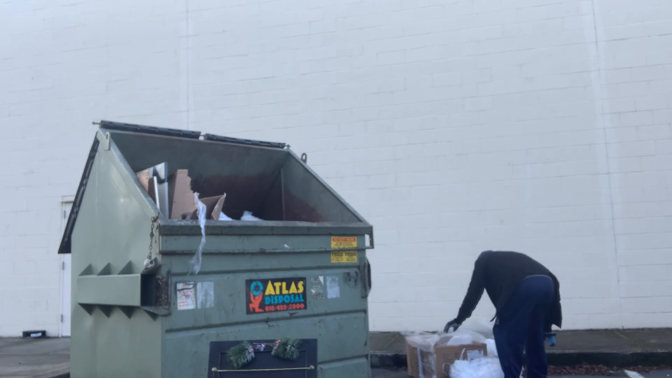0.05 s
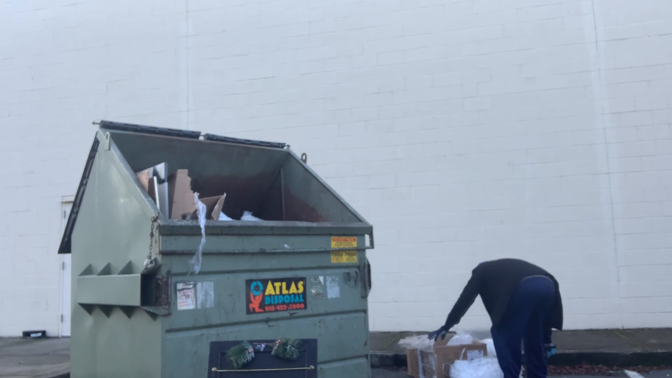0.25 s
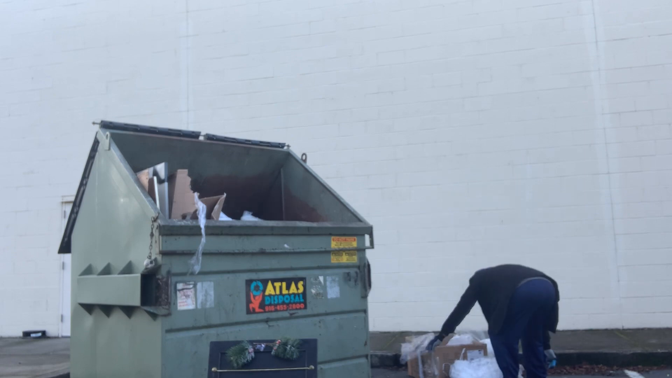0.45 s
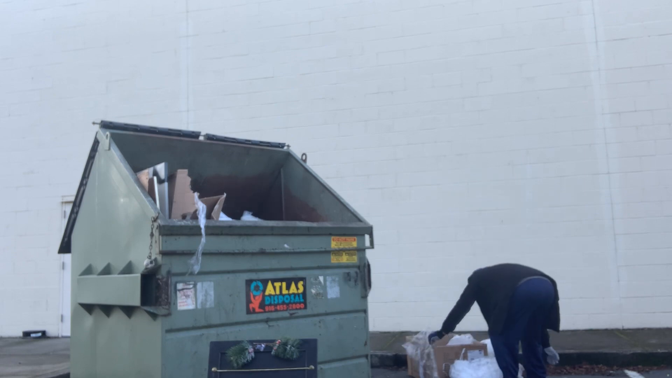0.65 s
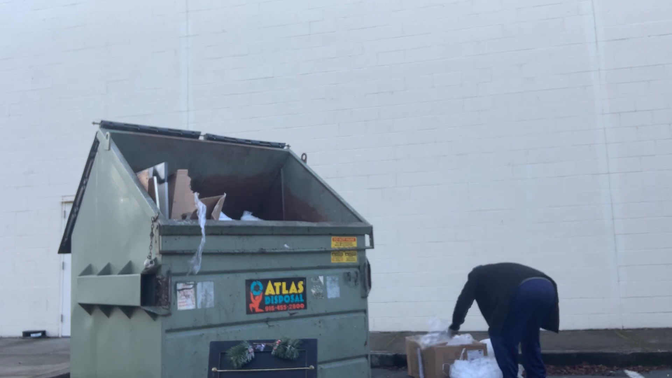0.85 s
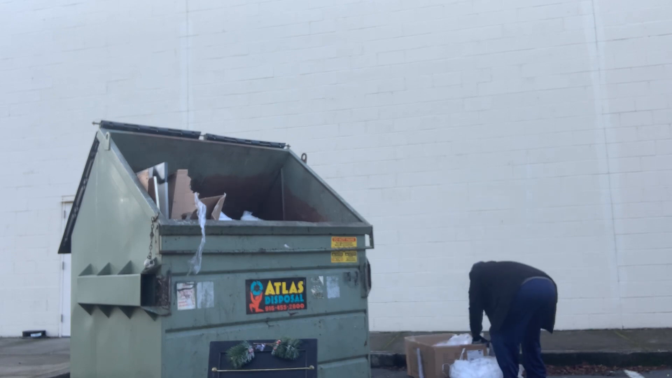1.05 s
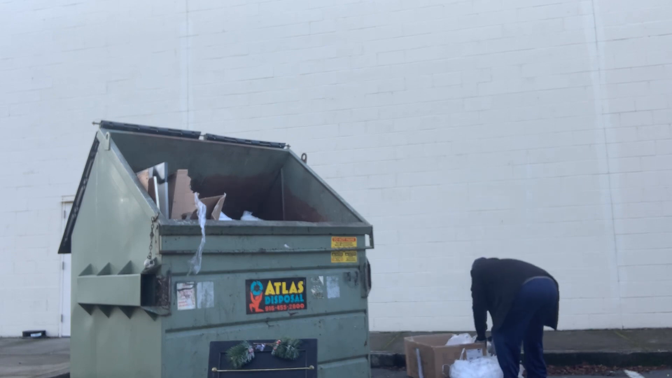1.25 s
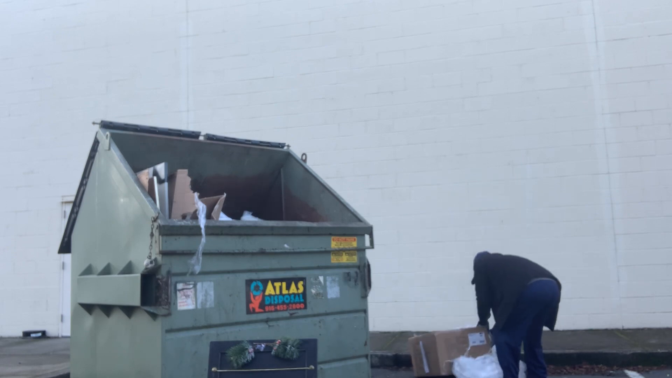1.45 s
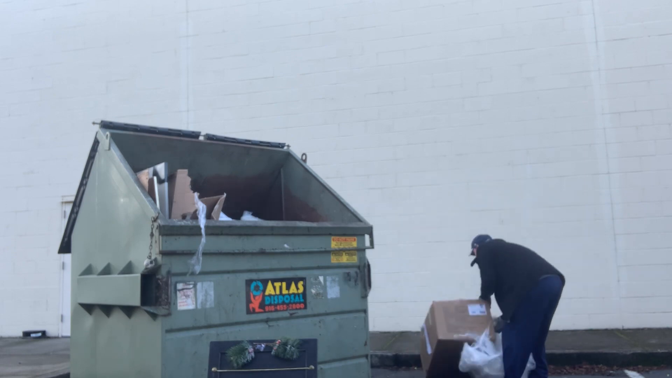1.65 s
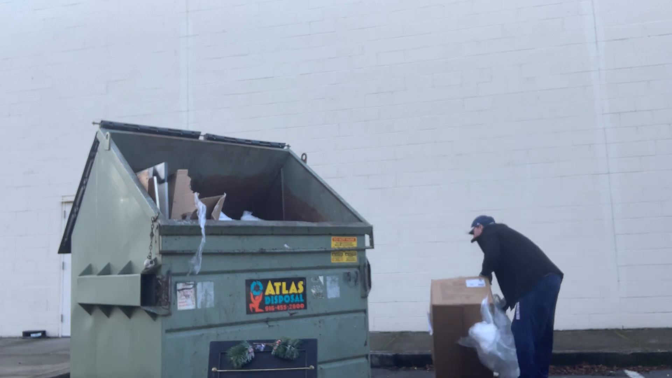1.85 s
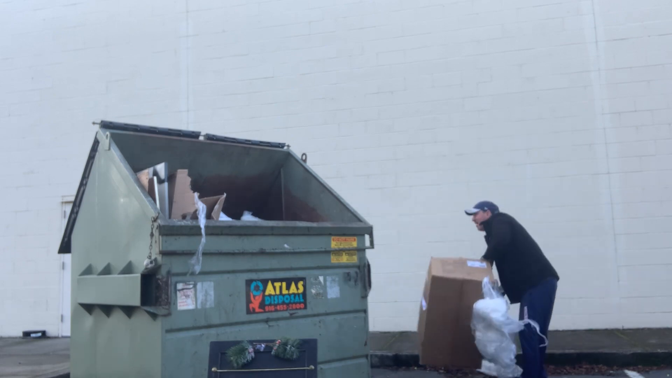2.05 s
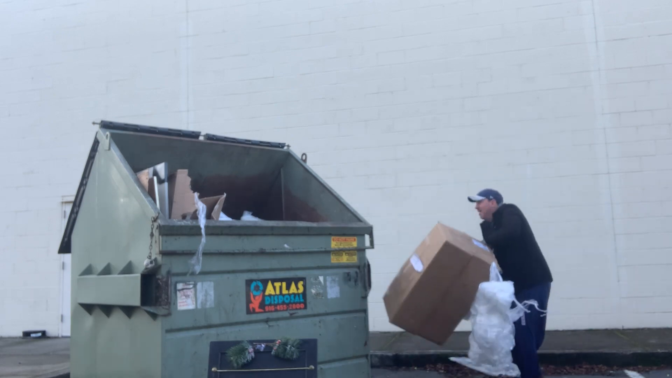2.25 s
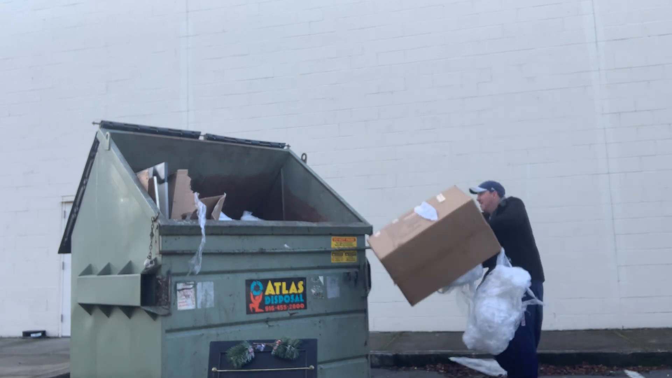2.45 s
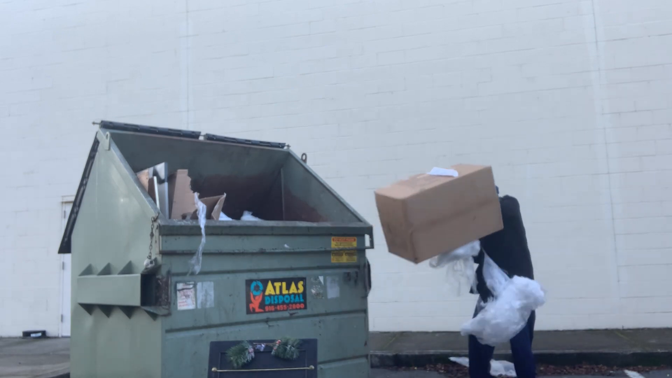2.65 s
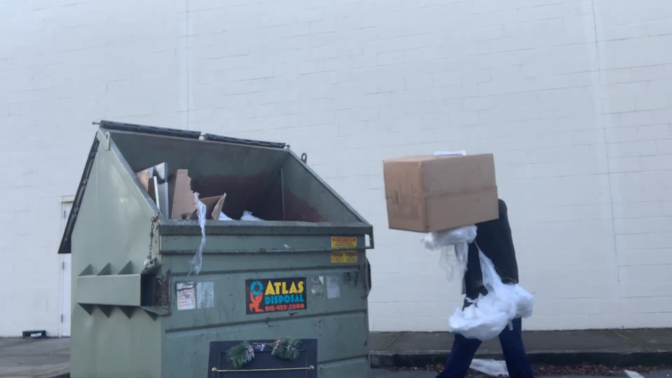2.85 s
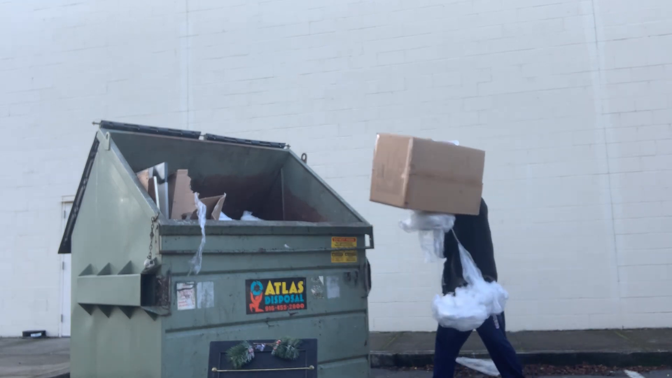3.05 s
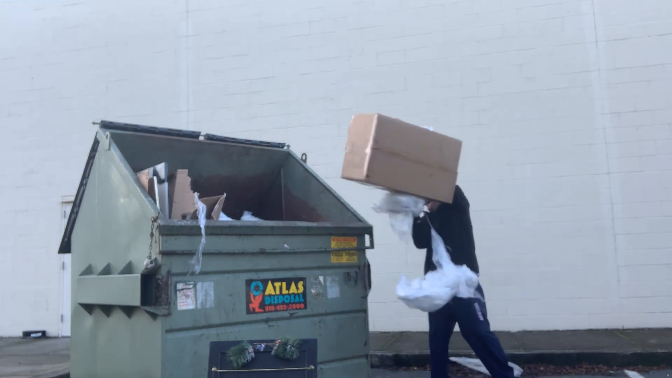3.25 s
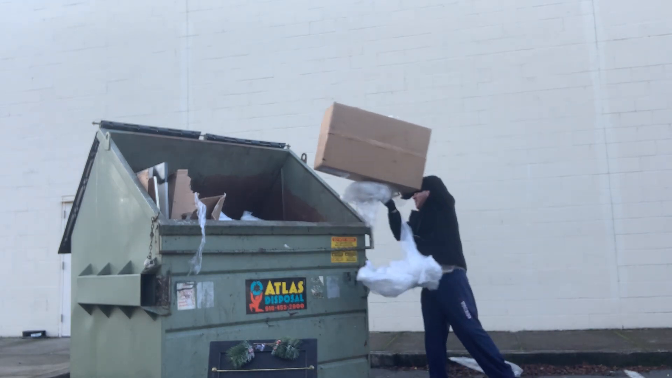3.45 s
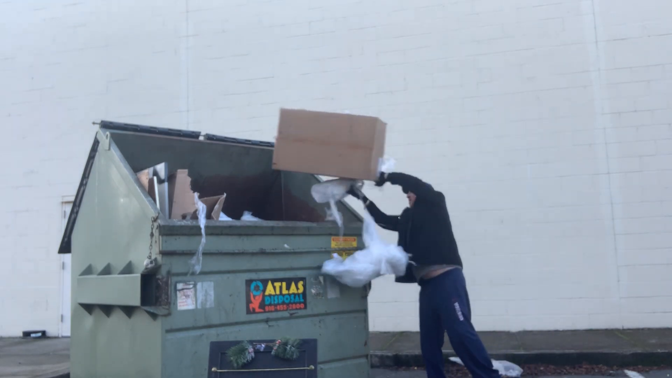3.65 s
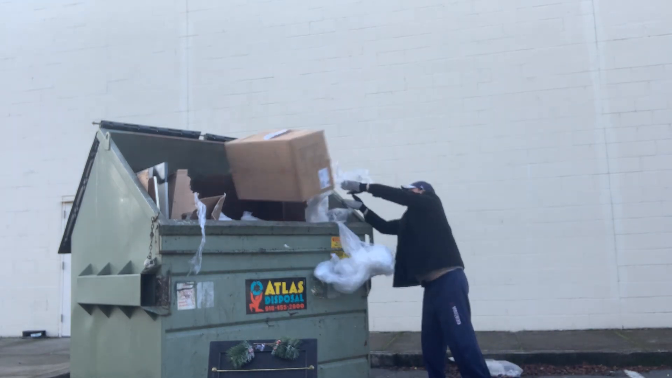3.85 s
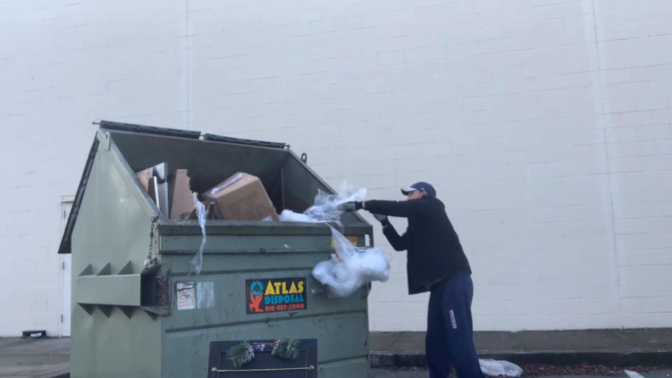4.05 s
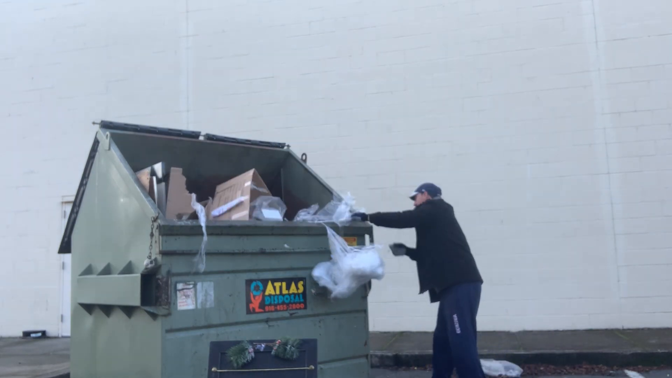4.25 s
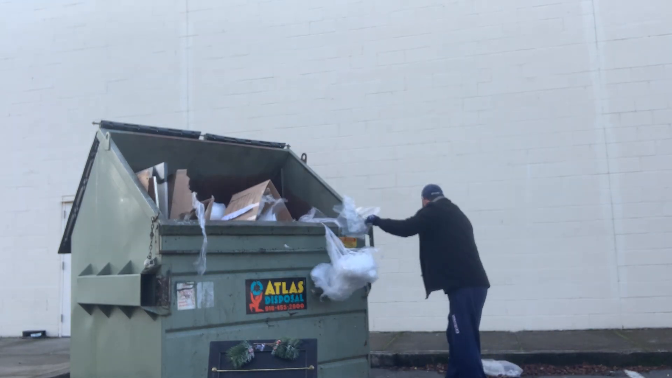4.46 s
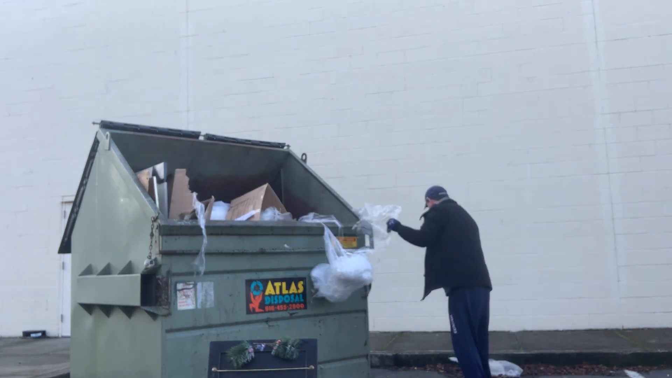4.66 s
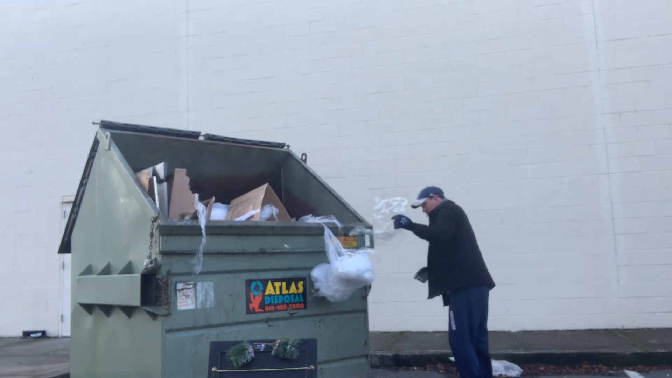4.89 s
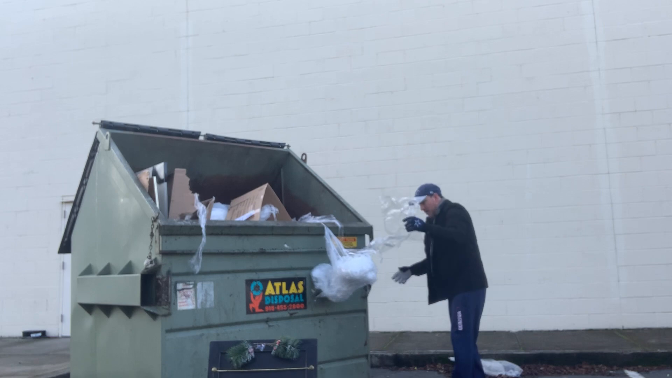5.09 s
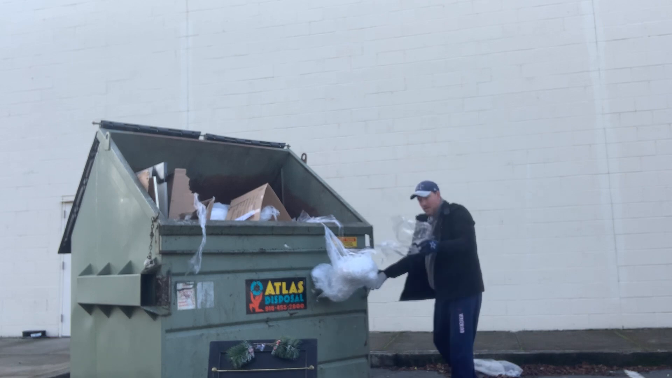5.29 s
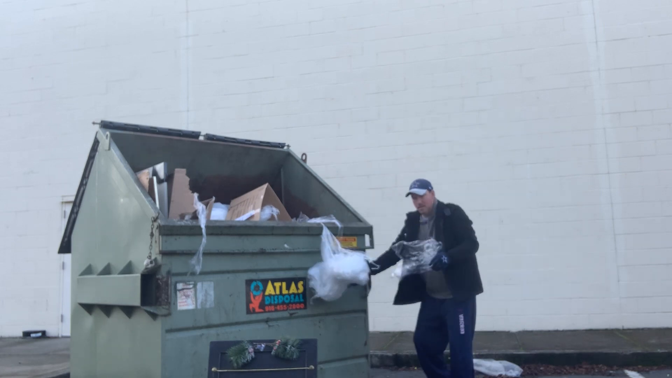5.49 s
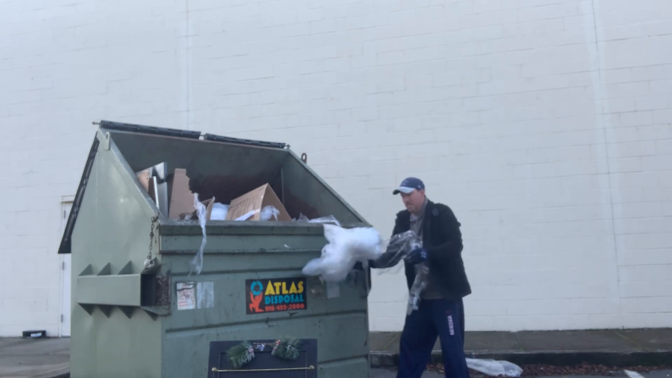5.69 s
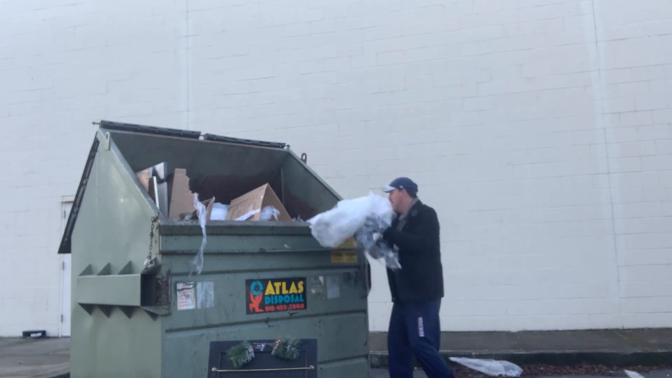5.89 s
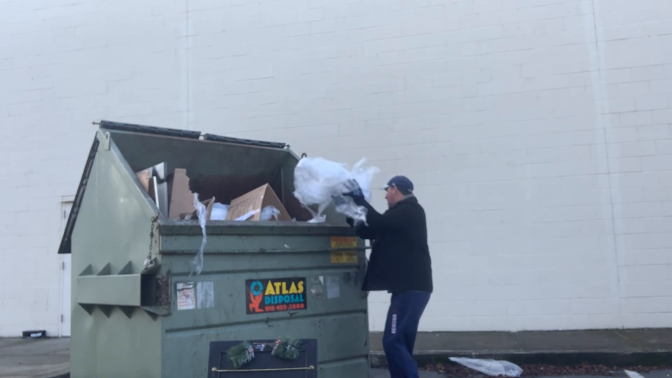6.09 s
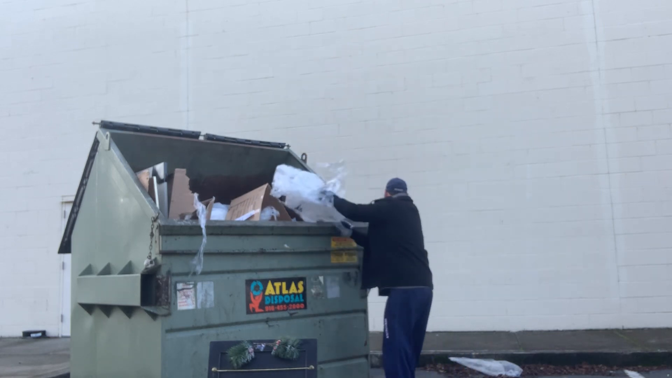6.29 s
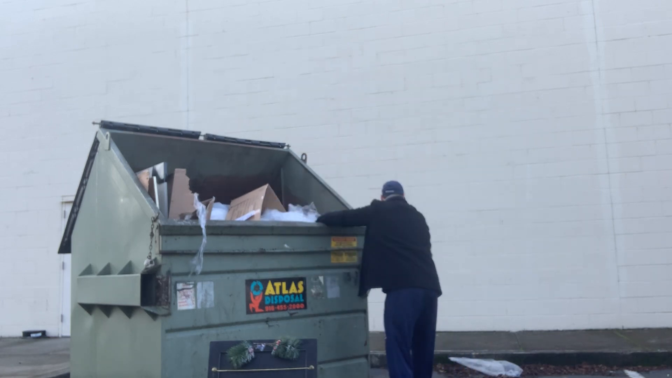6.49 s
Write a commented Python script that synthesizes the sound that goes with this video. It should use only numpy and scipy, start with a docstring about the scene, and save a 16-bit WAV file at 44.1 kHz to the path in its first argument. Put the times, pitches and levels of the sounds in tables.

```python
"""Outdoors beside a wall, someone picks up an empty cardboard box and a bundle of plastic wrap and tosses the
box into a steel dumpster. Clumped clicks and bursts crinkle the plastic throughout and scrape the board; the
packing cracks once. The box knocks hollowly as it is carried, lands with a thud and slides in: bending panel
tones over dying box modes. The bin booms in low modes when bumped, and filtered noise makes distant traffic
over a faint hum. Each source sits in a stereo image whose phase shifts with its place."""
import sys
import numpy as np
from scipy import signal
from scipy.fft import rfft, irfft
from scipy.io import wavfile

SR = 44100
rng = np.random.default_rng(int(sys.argv[2]) if len(sys.argv) > 2 else 0)


def store_wav(level_fs):
    """Save 16-bit WAV to argv[1]."""
    pcm = np.round(np.clip(np.atleast_2d(level_fs), -1, 1) * 32767)
    wavfile.write(sys.argv[1], SR, pcm.T.astype(np.int16))


N = 287973
TIME = np.arange(N) / SR
FREQS = np.fft.rfftfreq(N, 1 / SR)
EDGE_HZ, LOW_CUT_HZ = 15950, 44  # top and bottom of what the microphones pass on

# The box leaves the ground. A pair: start and end in seconds.
LIFT_OFF = (1.667, 1.708)

# Each grab, tug or step that squeezes the plastic.
# Each row: start in seconds, length in seconds, relative level in dB.
SQUEEZES = [(-.06, 0.14, -54), (.27, 0.12, -50), (.35, 0.1, -38), (.47, 0.37, -41.5), (.69, 0.12, -33),
            (.83, 0.17, -36), (1.04, 0.45, -46.5), (1.37, 0.16, -42.5), (1.54, 0.091, -30.5),
            (1.72, .17, -44), (1.93, 0.1, -45), (2.15, 0.32, -50.5), (2.32, 0.34, -49), (2.6, 0.15, -43),
            (2.8, 0.24, -53.5), (2.95, 0.21, -50), (3.31, 0.054, -57), (3.44, 0.34, -50.5),
            (3.66, .24, -41), (3.94, 0.13, -36), (4.08, 0.43, -42.5), (4.17, 0.047, -39.5),
            (4.51, 0.22, -50.5), (4.72, .19, -45), (4.95, 0.039, -52.5), (5.17, 0.06, -45),
            (5.25, 0.16, -43.5), (5.42, 0.31, -43), (5.64, 0.11, -44), (5.75, 0.093, -36.5),
            (5.87, 0.089, -39), (5.99, 0.18, -39.5), (6.23, 0.099, -41.5), (6.32, 0.11, -33.5),
            (6.43, 0.073, -38)]
REST_DB = -60  # the bundle keeps settling between squeezes; same scale as SQUEEZES


def hands():
    """The movements of the hands as one gain, which drives both plastic and board."""
    return np.hypot(strokes(SQUEEZES), amp(REST_DB))


# Thick wrap in the box. Each row: frequency in Hz, relative density in dB per Hz.
WRAP_COLOUR = [(300, -36), (1500, -10), (2600, -6), (3600, -1), (5200, .5), (7200, .5), (9000, 0),
               (11000, .5), (13500, -1.5), (15700, -5)]
# The thin bag. Each row: frequency in Hz, relative density in dB per Hz.
BAG_COLOUR = [(300, -36), (1500, -10), (2500, -8), (3600, -1.5), (5000, -3.5), (6800, -5), (9000, .5),
              (11000, 0), (13500, -.5), (15700, -4)]
# The walk to the bin, after which the bag is heard more than the wrap. A pair: start and end in seconds.
ARRIVAL = (3.4, 3.74)
# The loudest folds of plastic snapping through.
# Each row: start in seconds, relative level of the bright snap in dB, of the duller crunch in dB.
SNAPS = [(0.303, -42, -58), (0.3945, -33, -52), (.43, -33, -43), (0.493, -32, -42), (0.599, -34, -46),
         (.8764, -33, -38), (0.938, -40, -45), (1.2737, -54, -39), (1.357, -39, -39), (1.4493, -28, -48),
         (1.556, -30, -47), (1.573, -28, -44), (1.5998, -26, -43), (2.083, -42.5, -54), (2.65, -42, -52),
         (3.818, -43, -33), (3.829, -34, -35), (4.045, -43, -45), (4.769, -45, -54), (4.836, -41, -35),
         (5.134, -35, -53), (5.7688, -37, -48), (5.8063, -31, -44), (5.835, -40, -35), (5.902, -48, -40),
         (5.9106, -38, -48), (5.9763, -35, -39), (6.045, -46, -45), (6.1334, -38, -33.5),
         (6.2625, -38, -46), (6.3599, -32, -46), (6.4863, -31, -31)]
SNAP_T60_S = 0.027
# A taut fold, brighter than the crinkle. Each row: frequency in Hz, relative density in dB per Hz.
SNAP_COLOUR = [(300, -46), (1500, -21), (3600, -6.5), (6500, -3), (9000, 5), (12000, 3), (15700, -7)]
# The thicker layers under a fold. Each row: frequency in Hz, relative density in dB per Hz.
CRUNCH_COLOUR = [(300, -16), (1200, -3), (2400, -4), (3600, 6), (5200, -5), (7000, 3), (10000, -25),
                 (15700, -28)]


def plastic(squeeze):
    """Countless small folds buckle, first in the wrap, then in the bag; larger ones crackle, a few snap."""
    small = grains(per_s=7000, spread_db=-1.0, clump_db=1.75, clumps_per_s=35)
    large = grains(per_s=300, spread_db=0.0, clump_db=2.0, clumps_per_s=27)
    folds = small + amp(-11.5) * large
    wrap, bag = passing(ARRIVAL)
    band = (7000, 15500)  # both materials are levelled here, in Hz
    coloured = wrap * tint(folds, WRAP_COLOUR, band) + bag * tint(folds, BAG_COLOUR, band)
    crinkle = amp(-6.5) * squeeze * coloured
    bright = bursts([(s, db, SNAP_T60_S) for s, db, _ in SNAPS])
    dull = bursts([(s, db, SNAP_T60_S) for s, _, db in SNAPS])
    snaps = amp(-1.0) * tint(bright, SNAP_COLOUR)
    crunches = amp(-6.0) * tint(dull, CRUNCH_COLOUR)
    return yard(crinkle + snaps + crunches, wet_db=-9.5, t60_low=0.33, t60_high=0.055)


# Blows on the empty box as it bumps off the ground, is jostled, lands and tumbles.
# Each row: start in seconds, relative level in dB, settled pitch of the struck panel in Hz, T60 in seconds.
KNOCKS = [(1.613, -29, 810, 0.015), (1.621, -25.5, 290, .035), (1.682, -29, 434, 0.024),
          (2.364, -32.5, 534, .03), (2.918, -14.5, 484, 0.022), (2.9213, -26, 289, 0.029),
          (2.94, -35, 393, .07), (3.211, -24, 620, 0.01), (3.2148, -12.5, 362, 0.019),
          (3.2215, -22.5, 192, .05), (3.254, -32, 255, 0.076), (3.3375, -37, 560, 0.013),
          (3.3388, -25.5, 265, .035), (3.3458, -26, 180, 0.031), (3.3578, -37, 234, .06),
          (4.0147, -11, 290, 0.019), (4.022, -26, 191, .03), (4.0281, -15, 150, 0.021),
          (4.029, -34, 427, .03), (4.041, -20.5, 105, 0.052), (4.052, -27.5, 287, 0.13),
          (4.074, -32, 473, .06), (4.112, -30, 365, 0.033), (4.191, -26, 376, .018),
          (4.205, -29.5, 270, .035), (4.226, -32, 420, 0.035), (4.2371, -28, 364, .018),
          (4.2671, -25, 340, 0.021), (4.279, -30, 430, 0.015), (4.2992, -27, 170, 0.041)]
# Modes of the whole box, before their scatter.
# Each row: frequency in Hz, relative level in dB, T60 in seconds.
BOX_MODES = [(150, -9.5, 0.1), (231.4, -9, 0.25), (277.5, -7.5, .17), (355, -5.5, 0.13), (456, -7, .11),
             (534, -6.5, 0.071), (750, -10, 0.024), (990, -16, 0.014), (1460, -15, .021)]
# The hollow box shuddering or fluttering. Each row: frequency in Hz, relative density in dB per Hz.
HOLLOW_COLOUR = [(60, -5.5), (150, 1), (280, -6), (480, -3), (700, -16.5), (1000, -13.5), (1500, -19),
                 (4000, -52)]


def knocks():
    """Each blow flaps one panel and stirs the modes of the whole box, which shift as it is dented."""
    out = np.zeros((2, N))
    for s, db, hz, t60 in KNOCKS:
        panel = flap(hz, t60, contact_s=0.0021)
        whole = ring(BOX_MODES, contact_s=0.00055, scatter=0.064)
        add(out, s, amp(db) * (panel + amp(-13.5) * whole))
    flutter = amp(-18) * tint(bursts([(s, db, .09) for s, db, _, _ in KNOCKS]), HOLLOW_COLOUR)
    return yard(out + flutter, wet_db=-11, t60_low=.42, t60_high=.2)


BEND, BEND_S = 0.26, 0.0036  # a struck panel starts sharp by this share and relaxes with this time constant


def flap(hz, t60, contact_s):
    """A dented panel swings back, its pitch sagging as it relaxes; two parts a quarter cycle apart."""
    t = TIME[:SR]
    turns = np.cumsum(hz * (1 + BEND * np.exp(-t / BEND_S))) / SR
    envelope = amp(-60 * t / t60) * (1 - np.exp(-(t / contact_s) ** 2))
    z = envelope * np.exp(2j * np.pi * turns)
    return np.array([z.imag, z.real])


# Harder scrapes of the board on the ground, the rubbish and the rim.
# Each row: start in seconds, length in seconds, relative level in dB.
SCRAPES = [(.7, 0.043, -42.5), (1.41, 0.1, -49), (1.51, 0.1, -45), (1.57, 0.06, -37.5), (1.76, 0.23, -54.5),
           (2.32, 0.037, -52), (2.62, 0.25, -56), (2.98, 0.093, -52), (4.015, 0.06, -43),
           (4.255, 0.04, -47), (4.53, 0.068, -54.5), (5.55, 0.1, -55.5), (6.09, .031, -47)]
# Board on asphalt. Each row: frequency in Hz, relative density in dB per Hz.
ASPHALT_COLOUR = [(100, -25), (500, -9), (800, -6), (1150, -3.5), (1600, 1), (2100, -3), (2700, -7.5),
                  (4000, -9), (6500, -7), (11000, -14), (16000, -28)]
# Board on cloth and other board. Each row: frequency in Hz, relative density in dB per Hz.
CLOTH_COLOUR = [(100, -27.5), (500, 2.5), (800, -3.5), (1150, 1.5), (1600, 1.5), (2200, -6), (2700, -8.5),
                (3700, -5.5), (6500, -13), (11000, -90), (16000, -35)]
# The box shuddering as it is dragged, then as it slides into the bin: one level curve for each.
# Each row of a curve: time in seconds, relative level in dB.
SLIDES = [
    [(1.35, -55), (1.58, -45.5), (1.64, -54), (1.685, -45), (1.8, -67)],
    [(4.08, -36), (4.15, -49), (4.2, -47), (4.27, -44.5), (4.34, -50.5), (4.43, -53), (4.49, -55),
     (4.6, -59), (4.7, -82)],
]
# A stiff edge of the board snapping. Each row: frequency in Hz, relative density in dB per Hz.
EDGE_COLOUR = [(500, 9.5), (2000, -13.5), (3600, 5.5), (5000, -8), (7500, -30), (16000, -35)]
# The box also rubs on sleeves and wrap: relative rub level in dB at a typical squeeze in dB,
# and dB of rub per dB of squeeze.
BRUSH_DB, TYPICAL_DB, BRUSH_FOLLOWS = -55, -41, 0.81


def cardboard(squeeze):
    """Rough board slips finely and catches coarsely, its creases tap, and the sliding box shudders."""
    fine = grains(per_s=3000, spread_db=0.5, clump_db=2.0, clumps_per_s=14.0)
    coarse = grains(per_s=260, spread_db=2, clump_db=2, clumps_per_s=30)
    slips = unit(fine + .7 * coarse)
    ground, lifted = passing(LIFT_OFF)
    band = (1000, 2200)  # both surfaces are levelled here, in Hz
    brush = amp(BRUSH_DB) * (squeeze / amp(TYPICAL_DB)) ** BRUSH_FOLLOWS
    friction = np.hypot(brush, strokes(SCRAPES))
    coloured = ground * tint(slips, ASPHALT_COLOUR, band) + lifted * tint(slips, CLOTH_COLOUR, band)
    rub = amp(-1.5) * friction * coloured
    taps = amp(-4.5) * creases()
    edges = amp(-2.5) * tint(bursts([(s, db, t60) for s, _, db, t60, _ in TAPS]), EDGE_COLOUR)
    drag = sum(level(rows) * (TIME > rows[0][0]) * (TIME < rows[-1][0]) for rows in SLIDES)
    judder = grains(per_s=900, spread_db=4.0, clump_db=2.0, clumps_per_s=19)
    shudder = amp(-1.5) * drag * tint(judder, HOLLOW_COLOUR, (170, 600))
    return yard(rub + taps + edges + shudder, wet_db=-10, t60_low=0.26, t60_high=0.3)


# Creases of the board tapping and their stiff edges snapping. Each row: start in seconds, relative level
# of the tap in dB, of the edge in dB, T60 of rasp and edge in seconds, pitch of the tap in Hz.
TAPS = [(1.4222, -32.5, -55, .04, 1750), (1.4328, -44, -35, 0.019, 1660), (1.4774, -32, -58, .025, 1480),
        (1.501, -36, -60, .02, 1530), (1.5266, -32.5, -58, 0.024, 1420), (1.5612, -28, -56, .029, 1470),
        (1.574, -31, -33, 0.035, 1270), (1.601, -28, -41, 0.088, 1460), (1.613, -22, -35, 0.059, 1580),
        (1.637, -29, -42, .05, 1770), (1.6655, -18.5, -40, 0.036, 1530), (1.684, -35, -51, 0.031, 1630),
        (1.987, -27.5, -47, 0.031, 1840), (2.083, -23, -37, 0.019, 1580), (2.108, -29, -40, 0.019, 1550),
        (2.1298, -33, -46, .025, 1370), (2.226, -36.5, -58, 0.014, 1150), (2.349, -39, -44, 0.056, 1200),
        (2.3734, -47, -34.5, .032, 1360), (2.9132, -39, -49, .03, 930), (3.095, -44, -58, .03, 1220),
        (3.2109, -36, -50, 0.017, 1260), (3.628, -37, -46, 0.031, 1290), (4.0126, -30, -46, .016, 1170),
        (4.03, -26, -29, 0.04, 1430), (4.0386, -27.5, -31, 0.026, 1270), (4.0452, -40, -23.5, 0.028, 1270),
        (4.117, -35.5, -50, 0.026, 1110), (4.2604, -34, -40, 0.046, 1420), (4.279, -31.5, -48, 0.045, 1600),
        (4.4, -33, -56, 0.027, 1460), (4.4846, -35, -52, 0.02, 1090), (4.5568, -41, -52, .025, 1310),
        (4.619, -42, -58, .03, 1390), (5.1034, -39.5, -53, 0.022, 1330), (5.6864, -27.5, -50, 0.017, 1550)]
# A crease of pitch TAP_HZ, before it shifts with the pitch.
# Each row: frequency in Hz, relative density in dB per Hz.
TAP_COLOUR = [(150, -7.5), (600, -5.5), (900, -6.5), (1250, 1), (1550, 3.5), (1900, -1), (2350, -10),
              (2900, -8.5), (4000, -24), (7000, -9), (11000, -30), (16000, -21)]
TAP_HZ = 1504
POP_DB, POP_T60_S, POP_DELAY_S = 5, 0.0085, 0.00099  # the fold flips over just after it starts to give


def creases():
    """Each crease of the board pops and rasps at its own pitch: the shorter the fold, the higher."""
    out = np.zeros((2, N))
    for s, db, _, t60, pitch in TAPS:
        shifted = [(hz * pitch / TAP_HZ, gain) for hz, gain in TAP_COLOUR]
        rasp = tint(burst(db, t60), shifted)
        add(out, s, amp(-1.5) * rasp)
        pop = ring([(pitch, db + POP_DB, POP_T60_S)], contact_s=0.00055)
        add(out, s + POP_DELAY_S, pop)
    return out


CRACK_S = 0.7046  # start of the one sharp crack
# The spray of the crack. Each row: frequency in Hz, relative density in dB per Hz.
SPRAY_COLOUR = [(100, -35), (400, -20), (800, -21), (1200, -1), (1800, -3), (2450, -14), (3400, 1),
                (4400, -5), (5300, 2.5), (6400, -5), (8700, .5), (10500, -3), (12500, -11), (15500, -8)]
# Its papery ring, before scatter. Each row: frequency in Hz, relative level in dB, T60 in seconds.
CRACK_MODES = [(1030, -16, .06), (1206, 0, .04), (1360, -1, .035), (1556, -4, .045), (1830, -4, .04)]
# The ring direct, then off the ground and the bin. Each row: delay in seconds, relative level in dB.
CRACK_PATHS = [(0, -14.5), (.0085, -18), (.019, -28), (.029, -30)]
# The board buzzing afterwards. Each row: frequency in Hz, relative density in dB per Hz.
RATTLE_COLOUR = [(100, -32), (450, -7), (780, -18), (1100, -5), (1300, -1), (1850, -11), (2400, -31),
                 (6000, -42)]


def crack():
    """A spray of treble, a short papery ring slapping back from ground and bin, and a dying rattle."""
    spray = tint(bursts([(CRACK_S, -11.3, .03)]), SPRAY_COLOUR)
    body = tint(bursts([(CRACK_S + 0.00498, -30, .16)]), RATTLE_COLOUR)
    for delay_s, db in CRACK_PATHS:
        papery = ring(CRACK_MODES, contact_s=0.00048, scatter=.008)
        add(body, CRACK_S + delay_s, amp(db) * papery)
    return yard(spray + body, wet_db=-11, t60_low=.28, t60_high=.28)


# Blows that reach the steel walls of the bin. Each row: start in seconds, relative level in dB.
BOOMS = [(4.04, -25), (4.054, -30), (4.089, -24.5), (4.332, -26), (4.411, -30), (4.649, -36),
         (5.512, -28.5), (5.66, -28.5), (5.754, -27), (5.983, -25), (6.138, -21.5)]
# Modes of the bin. Each row: frequency in Hz, relative level in dB, T60 in seconds.
BIN_MODES = [(55.4, -6, 0.29), (66.3, 3, 0.17), (82.5, 2, 0.15), (106.6, 1.5, 0.048), (147, -34, 0.093),
             (272, -24.5, 0.18), (345, -24, 0.049)]


def dumpster():
    """The big steel panels boom, damped by the rubbish inside."""
    out = np.zeros((2, N))
    for s, db in BOOMS:
        add(out, s, amp(db) * ring(BIN_MODES, contact_s=0.01))
    return out


# Far traffic. Each row: frequency in Hz, relative density in dB per Hz.
TRAFFIC_COLOUR = [(12, -45), (20, -7.5), (60, 2.5), (93, -2), (234, -12.5), (367, -15.5), (422, -18),
                  (607, -23), (897, -24.5), (1190, -27.5), (2020, -37.5), (2600, -37.5), (4810, -36.5),
                  (9140, -57), (16000, -77)]
TRAFFIC_DB = -43.5  # middle level between 40 and 140 Hz
# Machinery in the building. Each row: frequency in Hz, middle rms level in dB.
HUM = [(240, -60), (360, -61.5), (600, -63.5)]


def street():
    """Lumpy far traffic and a faint hum that wavers in level and phase."""
    noise = tint(rng.standard_normal((2, N)), TRAFFIC_COLOUR, (40, 140), size=16384)
    roar = noise * amp(TRAFFIC_DB + 1.3 * drift(12.0))
    hum = 0
    for hz, db in HUM:
        phase = 2 * np.pi * hz * TIME + .5 * drift(3.5)
        hum = hum + amp(db + 2 * drift(0.6)) * np.exp(1j * phase)
    return roar + np.sqrt(2) * np.array([hum.imag, hum.real])


# In the stereo image, a source on the ground. # Each row: frequency in Hz, phase lead of the left in radians,
# likeness of the two channels from 0 to 1.
GROUND = [(100, 0, .86), (500, -.9, .8), (900, -1.5, .45), (1400, -.55, .9), (2000, -.85, .85),
          (2600, -1.7, .7), (3300, -2.3, .72), (4000, -3.1, .97), (4700, -3.2, .96), (5400, -3.6, .76),
          (6600, -4.5, .72), (7600, -3.8, .75), (8100, -3.15, .99), (9800, -3.13, .99), (10500, -2.4, .77),
          (11500, -1.6, .7), (13200, -.1, .95), (16000, .1, .93)]
# A source held beside the bin. Each row: Hz, phase lead of the left in radians, likeness 0 to 1.
BESIDE = [(100, 0, .86), (500, -1.1, .7), (900, -1.6, .26), (1400, -.4, .88), (2500, -1.5, .6),
          (4000, -2.6, .45), (5200, -3.7, .42), (6600, -4.6, .5), (7600, -3.6, .75), (8100, -3.15, .99),
          (9800, -3.13, .99), (10500, -2.5, .77), (11500, -1.6, .66), (13200, -.1, .96), (16000, .1, .9)]
# A source at the bin. Each row: Hz, phase lead of the left in radians, likeness 0 to 1.
AHEAD = [(100, .3, .8), (500, .2, .88), (900, .1, .45), (1400, 0, .92), (2500, 0, .75), (3300, 0, .82),
         (4500, .4, .55), (5300, 1.2, .45), (6800, 2.4, .52), (7700, 3.14, .995), (9900, 3.14, .995),
         (11500, 4.7, .65), (13200, 6.2, .94), (16000, 6.3, .95)]
# The load goes over the rim, the person steps back, then leans in with the bag.
# Each row: time in seconds, place from 0 beside the bin to 1 at its rim.
AT_RIM = [(3.3, 0), (3.7, 0.96), (4.0, 1), (4.45, 1), (4.72, 0), (5.6, 0), (6.0, 0.94), (6.3, 1)]


def carried(x):
    """The sound moves with the load: up from the ground, then between the side of the bin and its rim."""
    down, held = passing(LIFT_OFF)
    turn = np.pi / 2 * np.clip(np.interp(TIME, *np.transpose(AT_RIM)), 0, 1)
    low = ports(x * down, GROUND)
    side = ports(x * held * np.cos(turn), BESIDE)
    rim = ports(x * np.sin(turn), AHEAD)
    return low + side + rim


def ports(x, place):
    """Two unrelated versions of a sound become two phase-shifted, partly alike channels."""
    a, b = rfft(x)
    phase = read(place, FREQS)
    same = np.clip(read(place, FREQS, axis=2), 0, 1)
    right = (same * a + np.sqrt(1 - same ** 2) * b) * np.exp(-1j * phase)
    return irfft(np.array([a, right]), N)


def yard(x, wet_db, t60_low, t60_high):
    """Adds scattered echoes off the wall, ground and bin; the treble dies at its own rate."""
    sparse = rng.random((2, SR)) < 3000 / SR
    taps = rng.standard_normal((2, SR)) * sparse * (TIME[:SR] > .006)
    hz, t, z = signal.stft(taps, SR, nperseg=256)
    t60 = read([(200, t60_low), (8000, t60_high)], hz)[:, None]
    tail = signal.istft(z * amp(-60 * t / t60) / np.sqrt(t60), SR, nperseg=256)[1]
    echoes = signal.fftconvolve(x, tail / np.linalg.norm(tail[0]), axes=1)[:, :N]
    return x + amp(wet_db) * echoes


ATTACK_S, RELEASE_DB_PER_S = 0.044, 159  # every stroke of the hands builds up, holds, then relaxes


def strokes(rows):
    """Gain of overlapping strokes with attack, hold and release, for rows of (s, length s, dB)."""
    power = np.zeros(N)
    for s, length, db in rows:
        t = TIME - s
        attack = np.clip(t / ATTACK_S, 0, 1)
        release_db = RELEASE_DB_PER_S * np.clip(t - length, 0, 1)
        power += (attack * amp(db - release_db)) ** 2
    return np.sqrt(power)


def passing(span):
    """Gains of equal total power that hand over from one state to the next during the span."""
    turn = np.pi / 2 * np.interp(TIME, span, [0, 1])
    return np.cos(turn), np.sin(turn)


def grains(per_s, spread_db, clump_db, clumps_per_s):
    """Tiny clicks of unequal size that come in clumps, in two unrelated versions."""
    size = amp(spread_db * np.minimum(rng.exponential(1, N), 4))
    size = size * (rng.random(N) < per_s / SR)
    clumps = amp(clump_db * drift(clumps_per_s))
    return unit(size * clumps * rng.standard_normal((2, N)))


CLICK_DB = 8.5  # a fold gives way with one click, this far above the burst that follows


def burst(db, t60):
    """A click, in the first version only, and noise that dies away after it."""
    t = TIME[:SR // 4]
    noise = amp(db - 60 * t / t60) * rng.standard_normal((2, len(t)))
    return noise + amp(db + CLICK_DB) * np.outer([1, 0], t == 0)


def bursts(rows):
    """Bursts laid out in time, for rows of (s, dB, t60 s)."""
    out = np.zeros((2, N))
    for s, db, t60 in rows:
        add(out, s, burst(db, t60))
    return out


def ring(modes, contact_s, scatter=0):
    """Dying modes after a soft contact, as two parts a quarter cycle apart."""
    t = TIME[:SR]
    z = 0
    for hz, db, t60 in modes:
        pitch = hz * (1 + scatter * rng.standard_normal())
        z = z + amp(db - 60 * t / t60) * np.exp(2j * np.pi * pitch * t)
    z = z * (1 - np.exp(-(t / contact_s) ** 2))
    return np.array([z.imag, z.real])


def tint(x, spectrum, band=None, size=4096):
    """Causal colour; white noise comes out with unit power in the band, or overall."""
    hz = abs(np.fft.fftfreq(size, 1 / SR))
    gain = amp(np.maximum(read(spectrum, hz), -100))
    lo, hi = band or (0, EDGE_HZ)
    gain = gain / np.sqrt(np.mean(gain ** 2 * (hz >= lo) * (hz <= hi)))
    minimum_phase = np.exp(np.conj(signal.hilbert(np.log(gain))))
    taps = np.fft.ifft(minimum_phase).real
    return signal.oaconvolve(x, taps[None, :size // 2], axes=1)[:, :N]


def drift(per_s):
    """Slow chance of rms 1."""
    return unit(irfft(rfft(rng.standard_normal(N)) / (1 + (FREQS / per_s) ** 4), N))


def level(rows):
    """A dB curve as a gain for every sample."""
    s, db = np.transpose(rows)
    return amp(np.interp(TIME, s, db))


def read(points, hz, axis=1):
    """One column of a table over log frequency."""
    table = np.array(points, float)
    return np.interp(np.log(hz + 1), np.log(table[:, 0] + 1), table[:, axis])


def add(mix, s, sound):
    """Lays a two-channel sound into the mix at time s."""
    start = max(round(s * SR), 0)
    part = mix[:, start:][:, :sound.shape[1]]
    part += sound[:, :part.shape[1]]


def amp(db):
    """Decibels to gain."""
    return 10 ** (np.asarray(db) / 20)


def unit(x):
    """Scales to rms 1."""
    return x / np.sqrt(np.mean(x ** 2) + 1e-20)


# In the stereo image, the crack low down by the box. # Each row: frequency in Hz, phase lead of the left in
# radians, likeness of the two channels from 0 to 1.
LOW_DOWN = [(100, 0, .86), (600, -1.5, .6), (1300, -.9, .9), (2400, -2.2, .7), (3500, -4.5, .8),
            (5300, -6.1, .8), (6600, -5.3, .6), (8200, -3.4, .95), (9800, -2.9, .95), (12200, -.2, .85),
            (16000, .3, .85)]
# The street all around. Each row: Hz, phase lead of the left in radians, likeness 0 to 1.
AMBIENT = [(60, 0, .78), (300, 0, .75), (600, -.3, .5), (900, -1, .2), (1500, -.3, .4), (4000, -3, .5),
           (8000, -3.14, .98), (9800, -3.14, .98), (13000, 0, .9)]


def scene():
    """All sources at their places; one squeeze of the hands drives both plastic and board."""
    squeeze = hands()
    handled = carried(plastic(squeeze) + knocks() + cardboard(squeeze))
    return handled + ports(crack(), LOW_DOWN) + ports(dumpster(), AHEAD) + ports(street(), AMBIENT)


# The two channels differ in colour. Each row: frequency in Hz, left minus right in dB.
LEAN = [(60, .5), (130, 2.6), (250, 2.2), (500, -1), (1200, -2), (2400, -.8), (4400, -1.1), (7500, 0)]


def record(dry):
    """The two channels differ a little in colour and shed the deepest bass; then the band limit."""
    low_cut = 1 / np.sqrt(1 + (LOW_CUT_HZ / (FREQS + 1)) ** 8)
    lean = amp(np.outer([.5, -.5], read(LEAN, FREQS)))
    heard = irfft(rfft(dry) * low_cut * lean, N)
    band_limit = signal.firwin(511, EDGE_HZ, window=("kaiser", 9), fs=SR)
    return signal.oaconvolve(heard, band_limit[None], "same")


dry = scene()
out = record(dry)
store_wav(out)
```